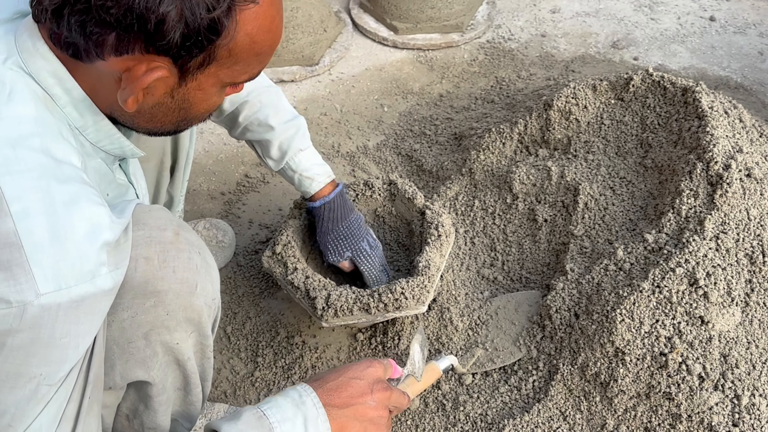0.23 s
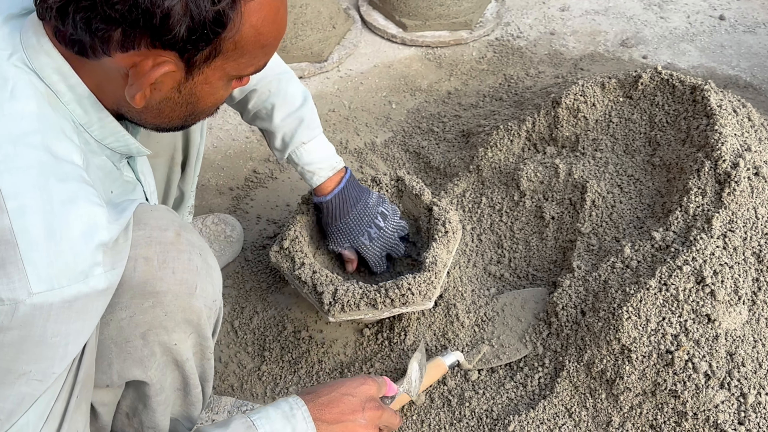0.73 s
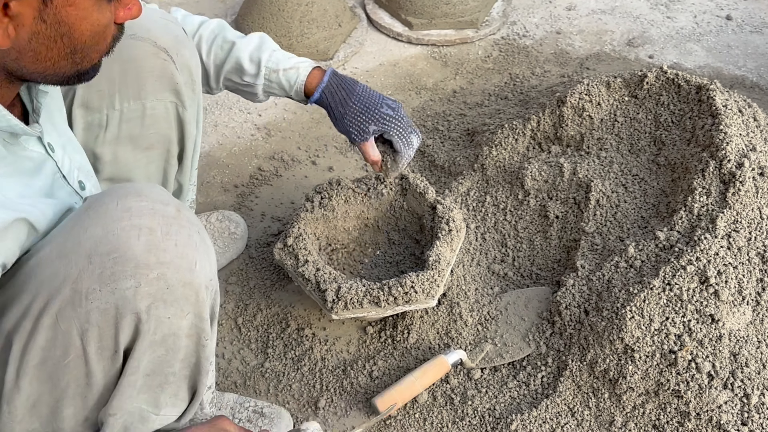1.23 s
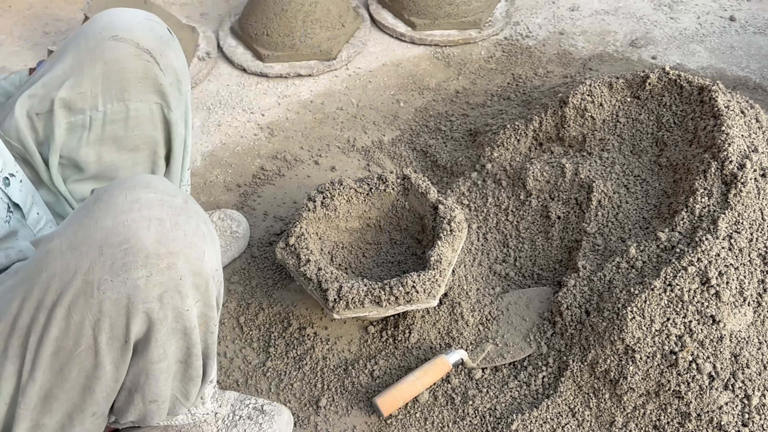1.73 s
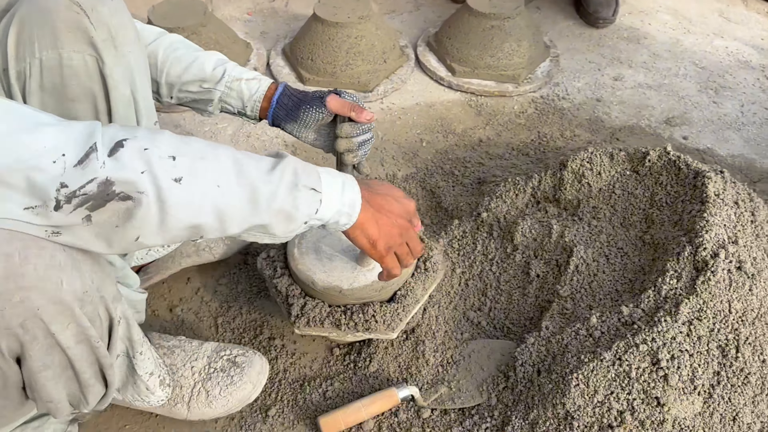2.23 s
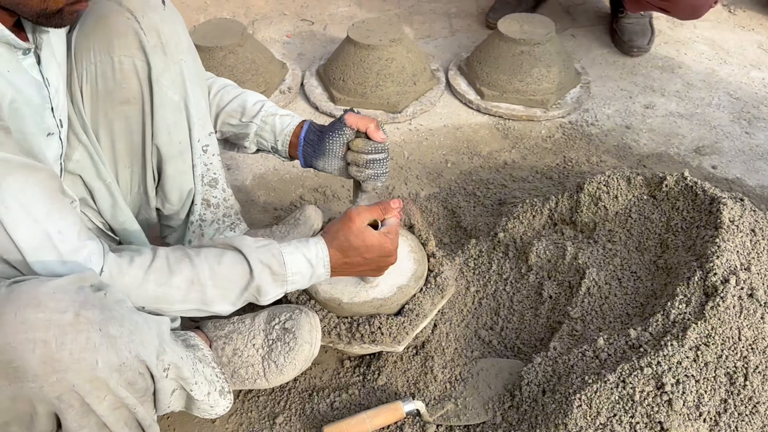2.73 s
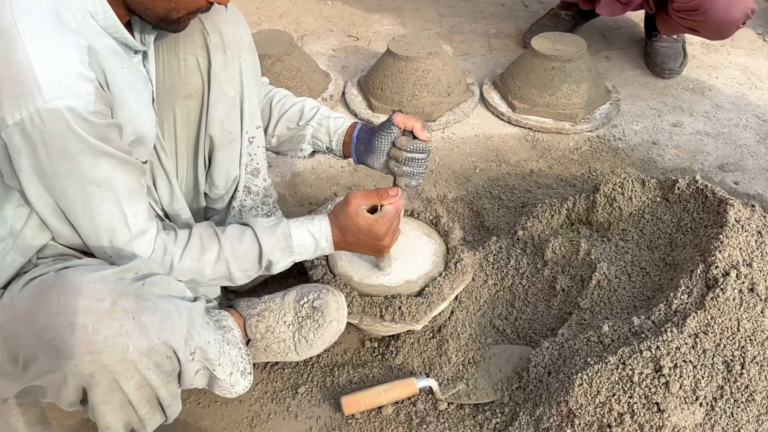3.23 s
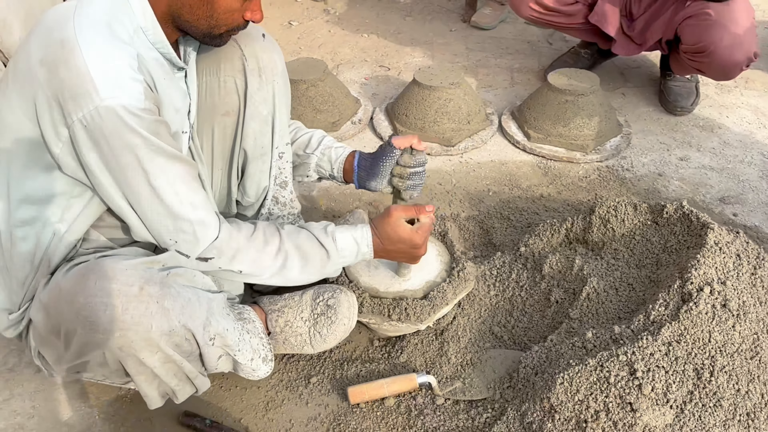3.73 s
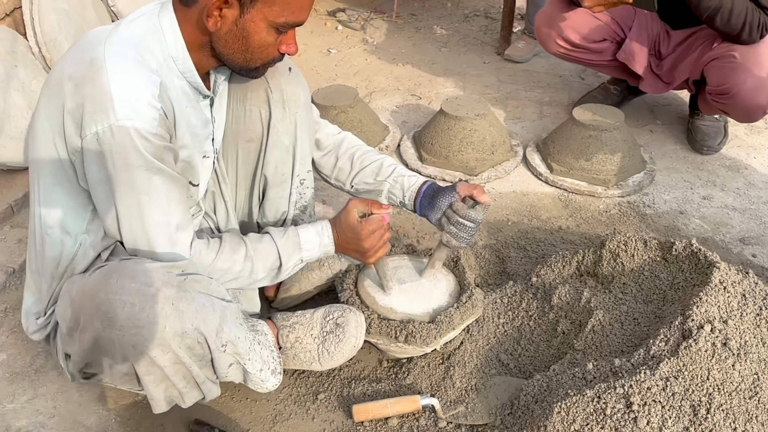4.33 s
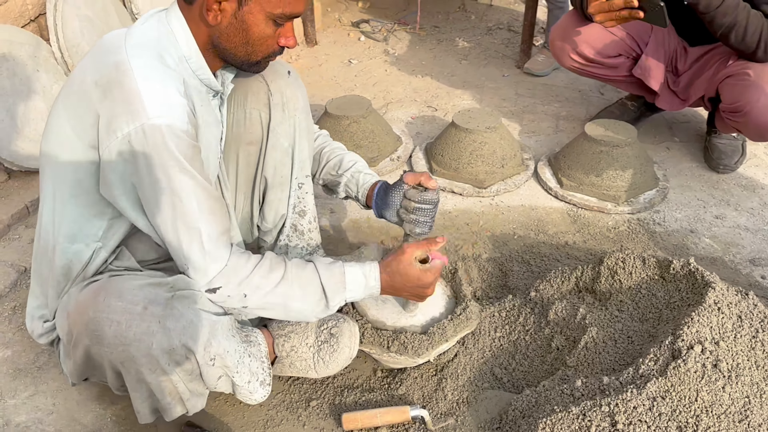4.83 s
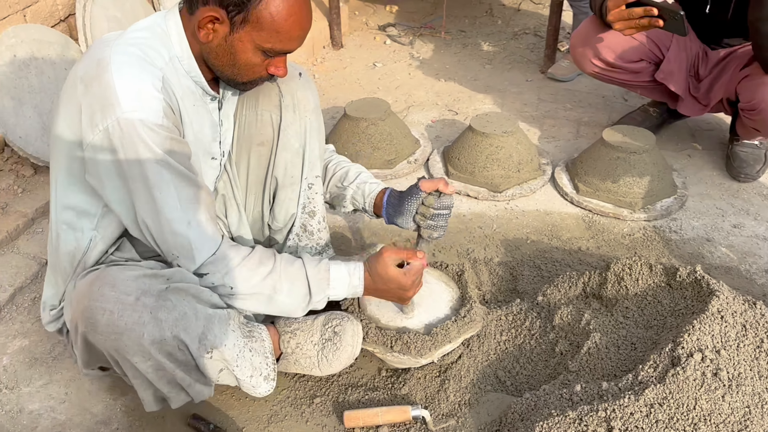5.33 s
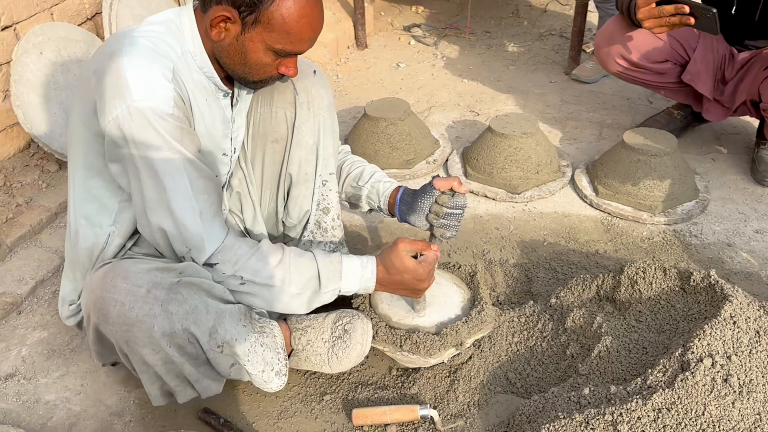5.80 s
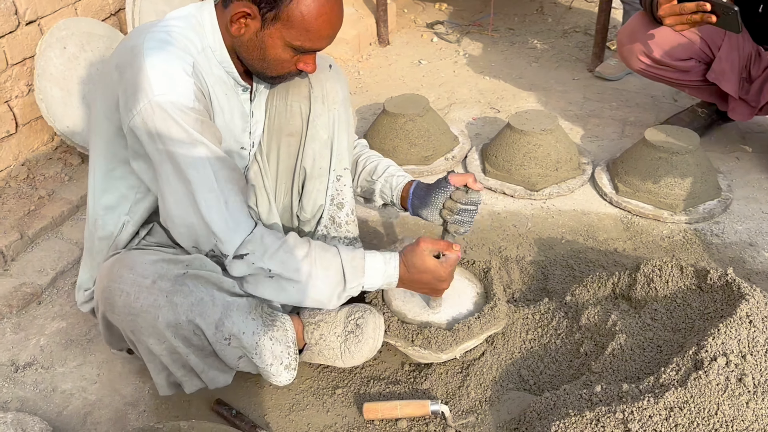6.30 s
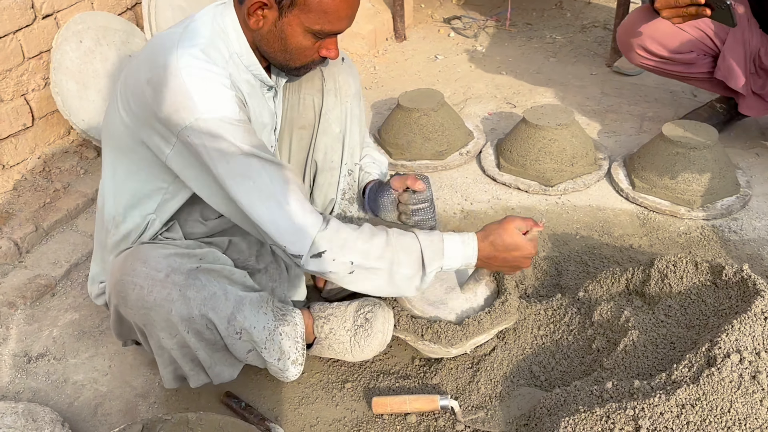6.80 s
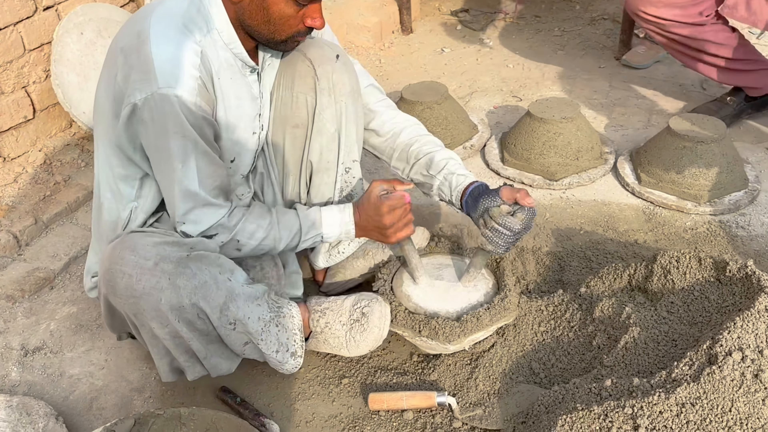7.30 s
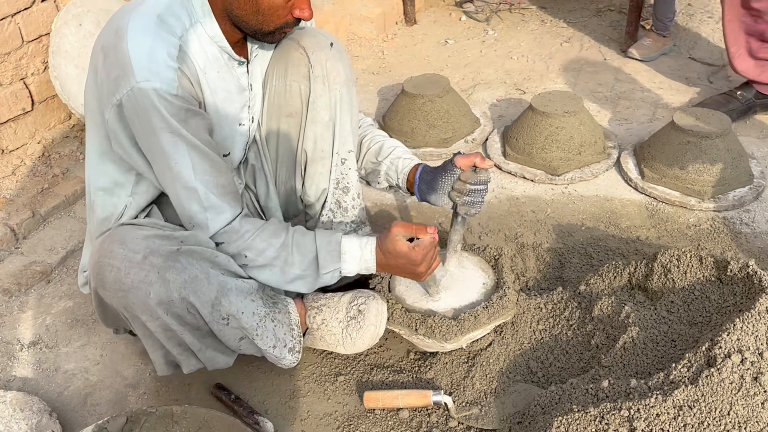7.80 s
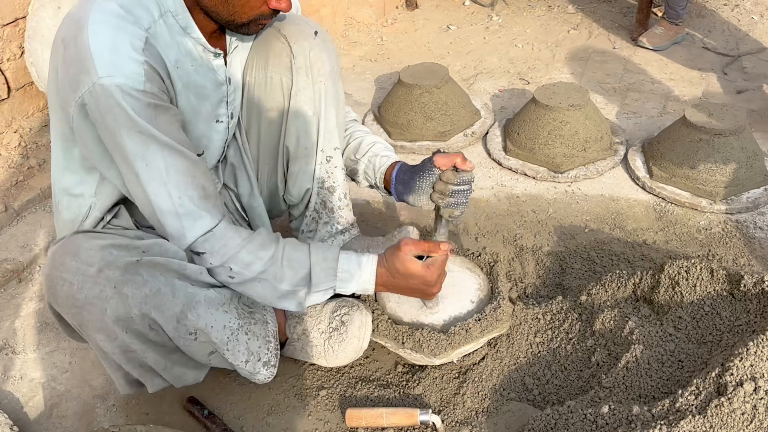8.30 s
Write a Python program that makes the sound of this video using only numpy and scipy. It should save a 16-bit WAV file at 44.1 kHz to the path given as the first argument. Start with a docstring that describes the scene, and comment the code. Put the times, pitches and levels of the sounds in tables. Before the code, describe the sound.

Crunchy scoops in wet grit, a brief tool rattle and a solid knock lead to rhythmic scraping twists of a form, with small pebble cracks.

```python
"""A moulder's yard

A steel trowel digs into damp gritty mix, a metal tool drops and rattles, and a heavy form is set down.
The form settles with gritty scuffs, then is twisted to and fro so that sand grinds under it; pebbles
crack, distant traffic rumbles. Noise stands for sand and traffic; decaying tones make the metal, form,
lumps and pebbles. A phone hears it through two ports, with short echoes from ground and walls."""
import sys
import numpy as np
from scipy import signal
from scipy.fft import rfft, irfft, next_fast_len
from scipy.io import wavfile
from scipy.ndimage import uniform_filter1d

SR = 44100
rng = np.random.default_rng(int(sys.argv[2]) if len(sys.argv) > 2 else 0)


def wav_out(sig):
    """Save sig, one row per channel (or a flat mono array), as 16-bit PCM at SR to the path in sys.argv[1]."""
    wavfile.write(sys.argv[1], SR, np.round(np.clip(np.atleast_2d(sig).T, -1, 1) * 32767).astype(np.int16))


N = 377055  # length of the scene in samples
TIME = np.arange(N) / SR  # seconds
LEFT_RIGHT = np.array([[1], [-1]])  # gives the two ports opposite signs

# tone of the echoes, with a deep hollow near 10.3 to 12 kHz: frequency_hz, relative_level_db
ECHO = [(100, -15), (400, -8.5), (900, -4.5), (1500, 2), (2100, -11.5), (5000, -15), (9700, -7.5),
        (10300, -45), (12000, -50), (12600, -4.5), (16000, -26)]


def undb(db):
    """Turn decibels into an amplitude factor."""
    return 10 ** (np.asarray(db) / 20)


def unit(x):
    """Scale to an rms of 1."""
    return x / np.sqrt(np.mean(x ** 2))


def peak(x):
    """Scale to a peak of 1."""
    return x / np.max(np.abs(x))


def colour(x, table):
    """Shape the spectrum of a sound by points of frequency (Hz) and level (dB)."""
    hz = np.maximum(np.arange(len(x) // 2 + 1) * SR / len(x), 1)
    point_hz, point_db = np.transpose(table)
    level_db = np.interp(np.log(hz), np.log(point_hz), point_db)
    return irfft(rfft(x) * undb(level_db), len(x))


def band(x, lo_hz, hi_hz):
    """Keep mainly what lies between two frequencies."""
    return signal.sosfilt(signal.butter(2, [lo_hz, hi_hz], "bandpass", fs=SR, output="sos"), x)


def tilt(x, db):
    """Raise or lower the treble."""
    return x + (undb(db) - 1) * band(x, 2920, 18500)


def ring(x, modes, trim_db, free=1):
    """Damped resonators driven by x; a smaller free shortens the ring of a thing that is held."""
    out = 0
    for (hz, db, t60), trim in zip(modes, trim_db):
        ring_s = max(free, .1) * t60  # time to die by 60 dB
        pole = np.exp(2j * np.pi * hz / SR - np.log(1000) / (ring_s * SR))
        out = out + undb(db + trim) * signal.lfilter([1], [1, -pole], x).imag
    return out


def add(out, start_s, sound):
    """Mix a sound in at start_s seconds."""
    i = int(start_s * SR)
    out[i:i + len(sound)] += sound[:N - i]


def walk(rate):
    """A smooth random wander of rms near 1: rate new values a second, averaged twice."""
    k = int(SR / rate)
    steps = np.repeat(rng.standard_normal(N // k + 1), k)
    return unit(uniform_filter1d(uniform_filter1d(steps, k), k)[:N])


def grit(size, spread_db):
    """Dense sand grains as noise; spread_db makes the grains differ in strength."""
    grain_db = spread_db * np.minimum(rng.exponential(size=size), 5)
    return unit(rng.standard_normal(size) * undb(grain_db))


def yard():
    """Traffic rumble under a faint hiss; what differs between the ports is shaped like the echoes."""
    # tone of the yard noise: frequency_hz, relative_level_db
    yard_tone = [(20, -44), (45, 5), (65, 10), (90, 0), (230, -13), (950, -18), (2000, -24.5), (3600, -33),
                 (7500, -39), (11500, -76), (16000, -43)]
    # strength of the rumble: time_s, rms_level_db
    rumble_levels = [(0.0, -47.5), (2.71, -47.5), (3.17, -55), (8.55, -50.5)]
    mid, side = (colour(rng.standard_normal(N), yard_tone) for _ in range(2))
    low = band(mid, 38, 100)
    rumble = unit(low) * undb(np.interp(TIME, *np.transpose(rumble_levels)))
    rest_gain = undb(-54) / np.std(mid - low)
    hiss = rest_gain * (mid - low) * undb(2.9 * walk(2.483))
    wide = rest_gain * colour(side, ECHO) * undb(0.5)
    return rumble + hiss + wide * LEFT_RIGHT


def faint_hiss():
    """A faint, patchy treble hiss during the first three seconds, made of grainy noise."""
    # strength of the hiss before its random wander: time_s, level_db
    hiss_levels = [(0.0, -87), (1.21, -68), (1.32, -86), (2.05, -61), (2.18, -65.5), (2.57, -67),
                   (2.91, -66), (3.01, -47.5)]
    db = np.interp(TIME, *np.transpose(hiss_levels), right=-120) + 2.5 * walk(25)
    return unit(band(grit(N, spread_db=6.0), 1800, 10200)) * undb(db)


def clods(t, count, spread_s):
    """Lumps that break, each a few cycles at its own pitch, thickest at the start."""
    when, pitch, size = rng.random((count, 3)).T[:, :, None]
    age = np.maximum(t + spread_s * np.log(1 - when), 0)  # seconds since the lump broke
    hz = 450 * 2 ** (3.6 * pitch)
    return np.sum(undb(-12 * size) * np.sin(2 * np.pi * hz * age) * np.exp(-age * hz / 11), axis=0)


def digs_and_scuffs():
    """Grit crunches and fades; a dull thud and a damped steel ring go with each dig or scuff."""
    # digs into the mix and, from 2.1 s, gritty scuffs and catches as the form settles; thud and ring
    # are relative to level_db, treble_db is a tilt:
    # start_s, level_db, thud_db, steel_ring_db, treble_db, scrape_s
    grit_events = [(0.127, -18.5, -8.5, -7.5, -7.5, 0.025), (0.471, -39.5, 2.5, -18.5, -1, 0.02),
                   (0.7558, -29, -1, -15.5, 3, 0.024), (0.9934, -23, -6, -8, -6, 0.035),
                   (1.1997, -25, -6.5, -1, -4.5, 0.035), (2.0377, -33, -3, -10, 0.5, 0.021),
                   (2.117, -35.5, -23, -30, -23, 0.085), (2.213, -33.5, -23, -8, 2, 0.053),
                   (2.334, -34.5, -15, -25, 4, .005), (2.539, -26, -17.5, -6.5, 3.5, 0.085),
                   (2.8337, -28.5, -12, -6, 2, 0.056), (2.927, -36, -14, -4, -6, 0.074),
                   (3.2328, -24.5, -17, -5, -5.5, 0.034), (3.496, -19, -14, -13, 7, 0.025),
                   (4.0637, -17.5, -33, -13.5, 5.5, 0.019), (4.8, -26.5, -22, -7, 1, .04)]
    # tone of the crunch: frequency_hz, relative_level_db
    crunch_tone = [(300, 0.5), (750, -13), (1800, -1), (2600, -4), (4500, -10.5), (8000, -7), (11500, -8.5),
                   (16000, -21.5)]
    # ringing tones of the steel when free: pitch_hz, relative_level_db, time_to_die_60_db_s
    steel_modes = [(750, -5, .12), (1276, -7, .2), (1525, -6, .14), (1780, -7, .12), (2232, -4, .2),
                   (2790, -2, .1), (3235, -5, .1), (3747, -5, .1), (5136, -10, .2), (5410, -4, .1),
                   (6050, -5, .1), (6800, -1, .08), (7910, -5, .12), (8285, -2, .08)]
    steel_free = 0.94  # share of its ring time that the mix leaves the steel
    out, t = np.zeros(N), np.arange(int(.5 * SR)) / SR
    for s, db, thud_db, ring_db, treble_db, length in grit_events:
        t60 = .2 + length  # the longer the scrape, the slower the crunch dies
        fade = undb(-60 * np.maximum(t - length, 0) / t60) * np.minimum(t / 0.0021, 1)
        bite = 1 + 2.98 * np.exp(-t / 0.0047)  # stronger for the first few ms
        lumps = undb(2.6 * unit(uniform_filter1d(rng.standard_normal(len(t)), size=200)))
        sand = unit(colour(grit(len(t), spread_db=0.5), crunch_tone)) * lumps * bite
        crunch = tilt(sand + 1.1 * clods(t, count=45, spread_s=.07), treble_db) * fade
        # loosened mix slides on, duller and slower to die
        slide = undb(-8) * band(band(sand, 210, 2200), 130, 3000) * fade ** 0.26 * (1 - t / t[-1])
        thud = band(rng.standard_normal(len(t)), 110, 298) * fade * np.minimum(t / 0.0087, 1)
        scrape = grit(len(t), spread_db=6.0) * fade * bite
        # the balance of the steel's tones varies each time
        trim_db = 2.5 * rng.standard_normal(len(steel_modes))
        steel = tilt(ring(scrape, steel_modes, trim_db, steel_free), treble_db)
        blow = peak(crunch + slide) + undb(thud_db) * peak(thud) + undb(ring_db) * peak(steel)
        add(out, s, undb(db) * blow)
    return out


def pings():
    """Lone metallic tones that linger after some blows: decaying sines, a little unsteady."""
    # tones before their random wander: start_s, level_db, pitch_hz, time_to_die_60_db_s
    lone_tones = [(.79, -39, 1530, 0.1), (1.232, -41.5, 5136, 0.32), (5.073, -39.5, 1740, 0.11)]
    out, t = np.zeros(N), np.arange(int(.4 * SR)) / SR
    unsteady = undb(2.0 * walk(60))
    for s, db, hz, t60 in lone_tones:
        tone = np.sin(2 * np.pi * hz * t) * np.minimum(t / 0.0027, 1)
        add(out, s, undb(db - 60 * t / t60) * tone)
    return out * unsteady


def tool():
    """Bounces and light touches of the tool; each adds a ring and clack and damps the ring before."""
    # bounces and light touches: start_s, level_db, clack_db (relative to level_db)
    touches = [(1.4995, -31, 4), (1.5225, -21, -10), (1.552, -40, 3), (1.574, -38, -2), (1.582, -32, -12),
               (1.6846, -46, 5), (1.724, -37, 4)]
    # ringing tones of the tool: pitch_hz, relative_level_db, time_to_die_60_db_s
    tool_modes = [(974, -12, .25), (1836, -20, .25), (2256, 0, .2), (3155, -17, .3), (3375, -8, .16),
                  (4070, -23, .25), (4220, -10, .13), (5028, -24, .2), (5712, -19, .35), (8550, -24, .2),
                  (9000, -22, .3)]
    out, t = np.zeros(N), np.arange(int(.4 * SR)) / SR
    for k, (s, db, clack_db) in enumerate(touches):
        hit = np.exp(-t / .00006)
        # the balance of the tones varies each time
        trim_db = 2.0 * rng.standard_normal(len(tool_modes))
        sing = peak(ring(hit, tool_modes, trim_db)) * np.minimum(t / .002, 1)
        if k + 1 < len(touches):
            next_touch_s = touches[k + 1][0] - s
            sing = sing * np.where(t < next_touch_s, 1, .4)
        clack = band(rng.standard_normal(len(t)), 120, 2160) * np.exp(-t / 0.015)
        add(out, s, undb(db) * (sing + undb(clack_db) * peak(clack)))
    return out


def knocks():
    """A short push makes the form ring briefly; a softer contact pushes longer and sounds duller."""
    # the form touches down, lands edge first, then flat, rebounds, rocks, and later bumps the mould:
    # start_s, peak_db, contact_ms
    blows = [(1.6866, -26.5, 1.5), (1.7181, -11.5, 0.28), (1.72, -5, 0.85), (1.723, -13.5, 0.67),
             (1.752, -28, 1.4), (1.77, -29, 0.89), (1.781, -25, 1.3), (5.058, -28, 1.36),
             (5.067, -27.5, 1.1)]
    # ringing tones of the form: pitch_hz, relative_level_db, time_to_die_60_db_s
    form = [(312, -23, 0.013), (537, -5.5, 0.013), (860, -4.5, 0.0077), (952, 2.5, 0.038),
            (1300, -4, 0.011), (1640, 18.5, 0.012), (2640, 17, 0.0086), (3670, 3, 0.036)]
    # loose sand hisses off the form: start_s, level_db, time_to_die_60_db_s
    spray = (1.7015, -27, .1)
    out, t = np.zeros(N), np.arange(int(.2 * SR)) / SR
    for s, db, contact_ms in blows:
        push = np.sin(np.pi * np.minimum(t * 1000 / contact_ms, 1))
        body = band(ring(push, form, np.zeros(len(form))), 196, 9000)
        add(out, s, undb(db) * peak(body))
        # grit is crushed and shaken loose under the blow
        crushed = band(grit(len(t), spread_db=4.0), 1600, 5000) * np.exp(-t / 0.024)
        add(out, s, undb(db - 23) * peak(crushed))
    s, db, t60 = spray
    hiss = band(band(grit(len(t), spread_db=-3.0), 4800, 18000), 4300, 13000)
    add(out, s, undb(db) * peak(hiss * undb(-60 * t / t60) * np.minimum(t / 0.0027, 1)))
    return out


def cracks():
    """Pebbles crack: each is a few cycles of a fast-dying tone and a bright tick of noise."""
    # cracking pebbles: start_s, level_db, pitch_hz
    pebbles = [(2.132, -35, 1060), (2.163, -27, 1300), (2.187, -36, 2040), (2.334, -41, 3740),
               (3.371, -32, 1950), (3.401, -23, 2220), (3.496, -27, 3170), (3.578, -25, 2080),
               (3.613, -21, 2060), (4.056, -27, 3100), (4.576, -26, 1480), (5.043, -24, 2370),
               (5.387, -33, 2610), (8.234, -21, 2320)]
    out, t = np.zeros(N), np.arange(int(.02 * SR)) / SR
    for s, db, hz in pebbles:
        tone = np.sin(2 * np.pi * hz * t) * np.exp(-t * hz / 1.3)
        tick = 0.22 * rng.standard_normal(len(t)) * np.exp(-t / 0.00096)
        add(out, s, undb(db) * (tone + tick))
    return out


def twists():
    """Sand grinds as fast as the form turns: quiet at each reversal, louder within the stroke."""
    # twists of the form, each lasting until the next reversal; level_db is the level aimed at by the
    # end of the stroke, swell_db the rise towards it: start_s, level_db, swell_db
    strokes = [(3.042, -42, 7), (3.186, -41, -.5), (3.345, -38, 6), (3.475, -37.5, 2.5), (3.637, -42, -2),
               (3.764, -39.5, -3.5), (3.888, -42, 2.2), (4.038, -39.5, -4.5), (4.26, -38, 1.5),
               (4.65, -37, 3.3), (4.98, -34, 12.5), (5.109, -42, -2), (5.238, -41, 7.5), (5.37, -37.5, 5),
               (5.492, -37, 11.5), (5.619, -37.5, 3.5), (5.741, -43, -0.5), (5.869, -41, -1.5),
               (5.982, -39, 9.5), (6.106, -42, 0.5), (6.23, -42.5, 2.5), (6.348, -39, -1.3),
               (6.57, -38.5, 2.5), (6.941, -37, 0.5), (7.334, -38, 6), (7.574, -39.5, 0.5),
               (7.706, -41, 5.5), (7.829, -39, 3), (7.96, -41.5, 4.5), (8.09, -34.5, 9.5),
               (8.218, -39, 3.5), (8.372, -37.5, 2), (8.501, -40.5, 3)]
    # tone of the grinding sand: frequency_hz, relative_level_db
    grind_tone = [(100, -2), (280, -8), (800, -2.5), (1600, -3.5), (2150, -0.3), (2850, -3.5), (3600, -3),
                  (4600, -9.5), (7500, -12), (9500, -13), (11500, -16.5), (16000, -25)]
    last_stop_s, overlap_s = 8.61, 0.0055
    # a long sweep grinds brighter than a short jerk
    jerk_s, jerk_treble_db, treble_db_per_doubling = 0.14, 0.17, 1.7
    sand = colour(grit(N, spread_db=1.5), grind_tone)
    # the bed of grains keeps changing, so each part of the spectrum flickers by itself
    for hz in (500, 900, 1600, 2400, 3500, 5500):
        sand = sand + (undb(2.64 * walk(30)) - 1) * band(sand, hz / 1.227, hz * 1.11)
    sand = unit(sand) * undb(.8 * walk(45))
    out = np.zeros(N)
    stops = [row[0] for row in strokes[1:]] + [last_stop_s]
    for (s, db, swell_db), end in zip(strokes, stops):
        length = end - s + overlap_s
        treble_db = jerk_treble_db + treble_db_per_doubling * np.log2(length / jerk_s)
        part = sand[int(s * SR):][:int(length * SR)]
        t = np.arange(len(part)) / SR
        # the form speeds up over part of the stroke and slows in the last 0.06 s
        start = np.minimum(t / (0.45 * length ** 0.81), 1)
        stop = np.clip((length - t) / 0.06, 0, 1)
        speed = np.sin(np.pi / 2 * start) ** 1.05 * np.sin(np.pi / 2 * stop) ** 1.32
        swell = undb(db + swell_db * (t / length - 1.0))
        add(out, s, tilt(part, treble_db) * speed * swell)
    return out


def scene():
    """Mix the sources, let ground and walls answer, and lay the yard under it all."""
    # sounds from the left reach that port ahead in phase: frequency_hz, relative_level_db
    aside_tone = [(100, -25), (400, -8.5), (1000, 2), (2500, -9), (6500, -19), (7200, -26)]
    echo_t60_s = 0.18  # time for the echoes to die by 60 dB
    aside = digs_and_scuffs() + pings() + tool() + knocks()
    work = twists() + faint_hiss() + cracks() + aside
    t = np.arange(int(.4 * SR)) / SR
    # one part of the echoes is alike at both ports, one part opposed
    tails = rng.standard_normal((2, len(t))) * undb(-60 * t / echo_t60_s)
    replies = [colour(unit(tail), ECHO) / np.sqrt(len(t)) for tail in tails]
    alike, opposed = (signal.fftconvolve(work, reply)[:N] for reply in replies)
    # a quarter turn ahead, added at the left port and taken away at the right
    ahead = -signal.hilbert(colour(aside, aside_tone), next_fast_len(N)).imag[:N]
    differing = undb(-6.0) * opposed + ahead
    return work + undb(-7.5) * alike + differing * LEFT_RIGHT + yard()


def record(dry):
    """The ports slip in phase against each other in the treble; the top is cut."""
    # phase by which the right port trails the left; half a turn hollows the centre:
    # frequency_hz, phase_turns
    port_slip = [(0, 0), (6700, .03), (7200, .15), (7550, .5), (7900, .88), (8300, 1), (9000, .96),
                 (9650, .78), (10400, .5), (11900, .5), (12400, .28), (13100, .1), (13800, 0)]
    balance_db, top_hz = -0.34, 16000  # left level against right, and where the top is cut
    size = next_fast_len(N + 2048)
    hz = np.arange(size // 2 + 1) * SR / size
    turns = np.interp(hz, *np.transpose(port_slip))
    # each port takes half of the slip and half of the balance
    slip = np.exp(1j * np.pi * turns * LEFT_RIGHT) * undb(balance_db / 2 * LEFT_RIGHT)
    wet = irfft(rfft(dry, size) * slip, size)[:, :N]
    return signal.sosfilt(signal.ellip(10, .2, 70, top_hz, fs=SR, output="sos"), wet)


dry = scene()
out = record(dry)
wav_out(out)
```